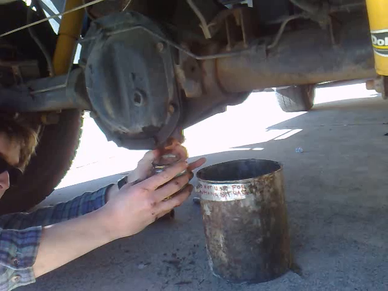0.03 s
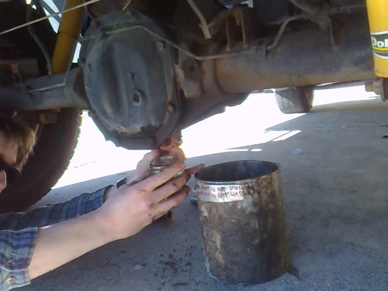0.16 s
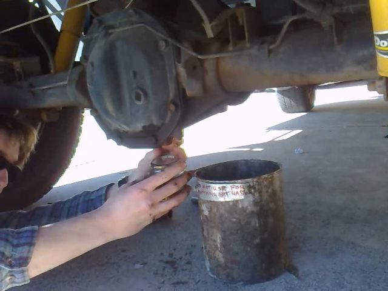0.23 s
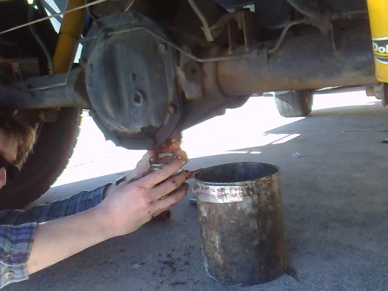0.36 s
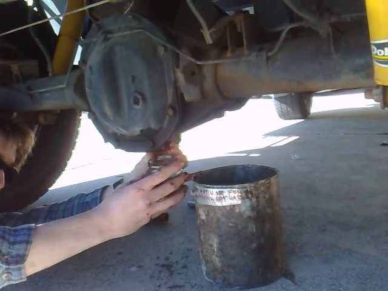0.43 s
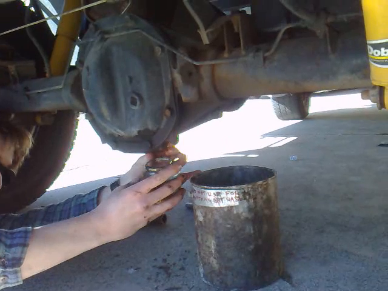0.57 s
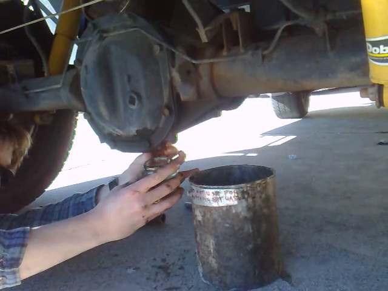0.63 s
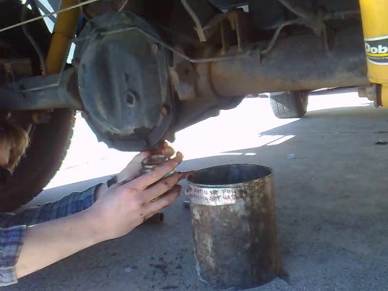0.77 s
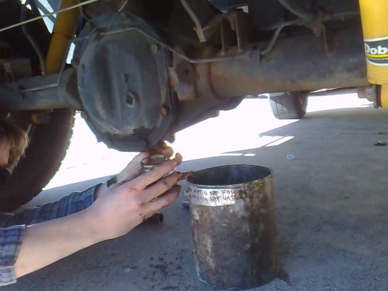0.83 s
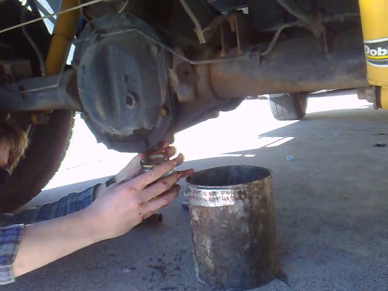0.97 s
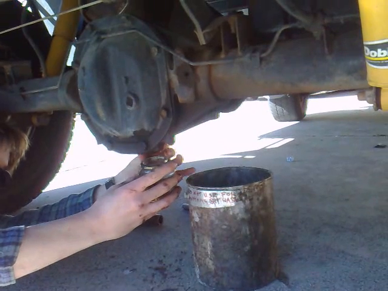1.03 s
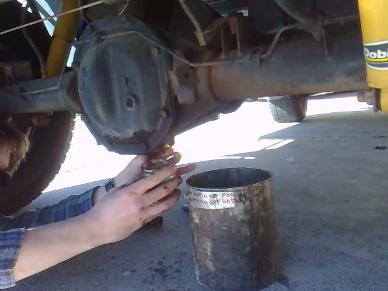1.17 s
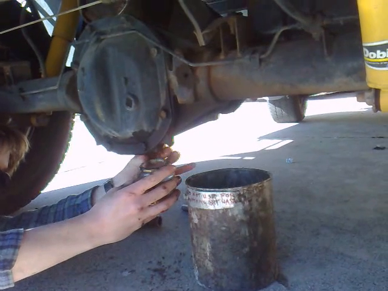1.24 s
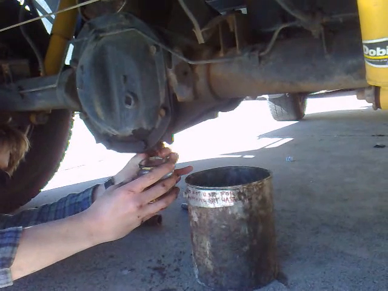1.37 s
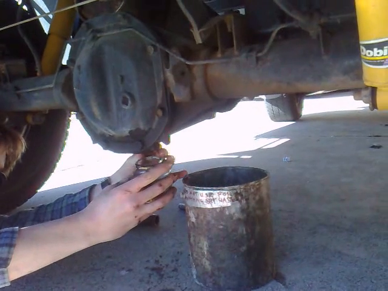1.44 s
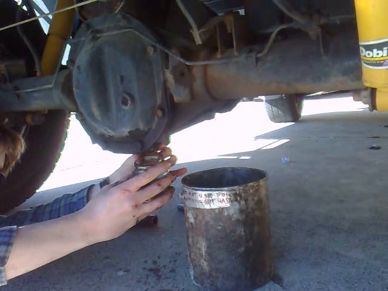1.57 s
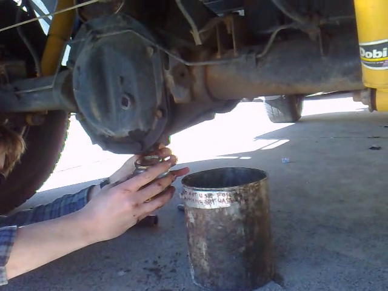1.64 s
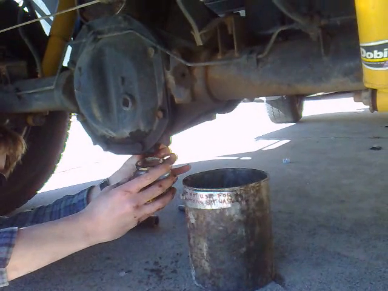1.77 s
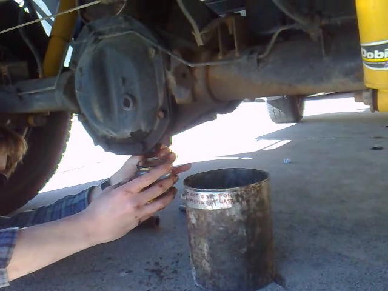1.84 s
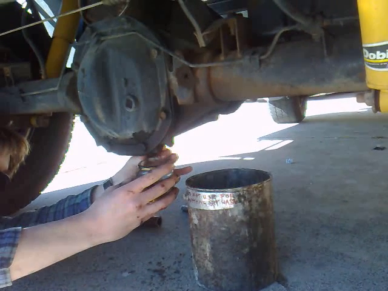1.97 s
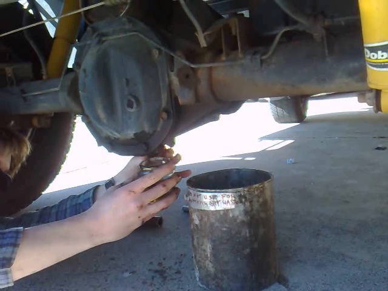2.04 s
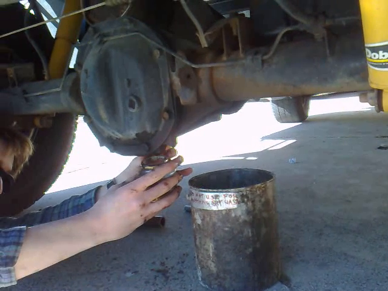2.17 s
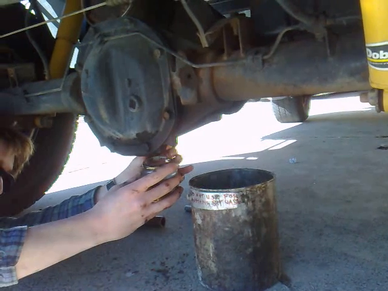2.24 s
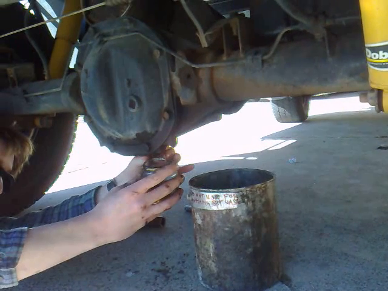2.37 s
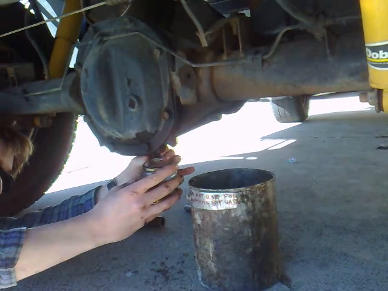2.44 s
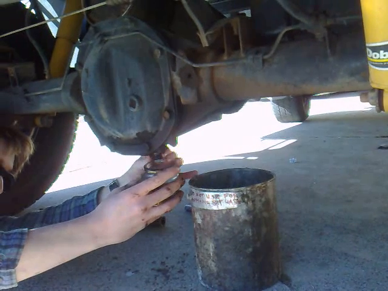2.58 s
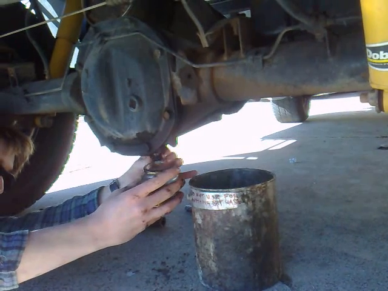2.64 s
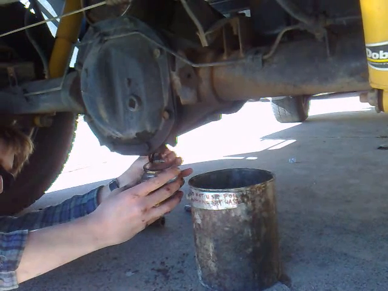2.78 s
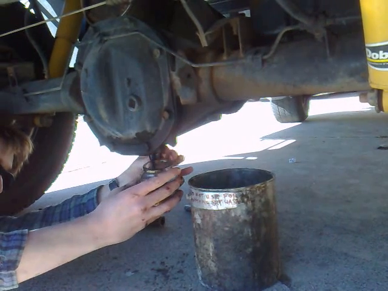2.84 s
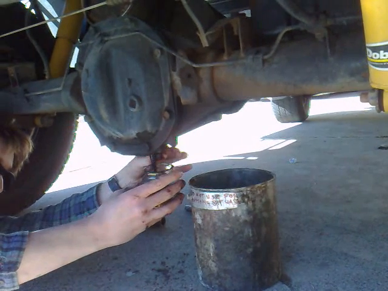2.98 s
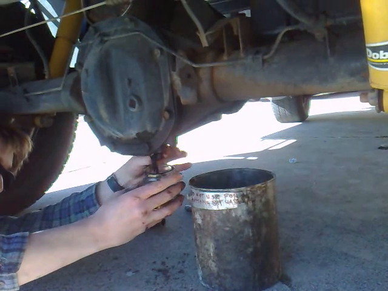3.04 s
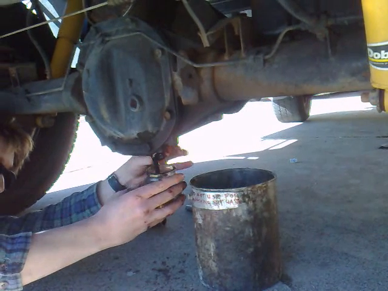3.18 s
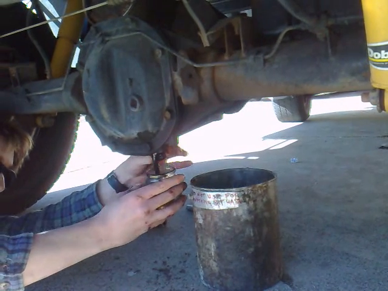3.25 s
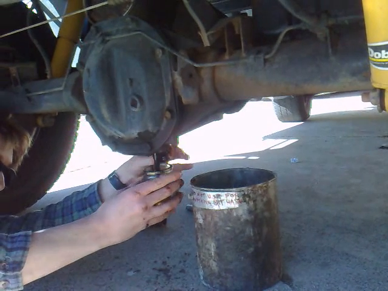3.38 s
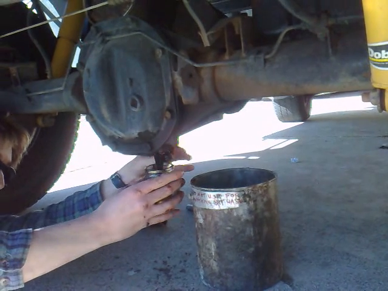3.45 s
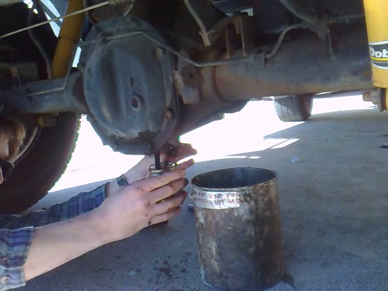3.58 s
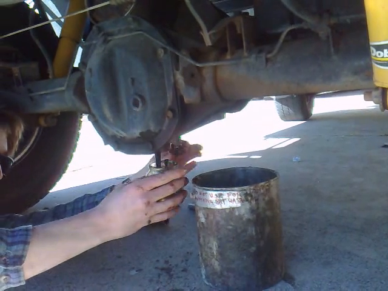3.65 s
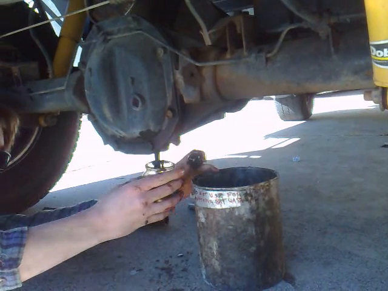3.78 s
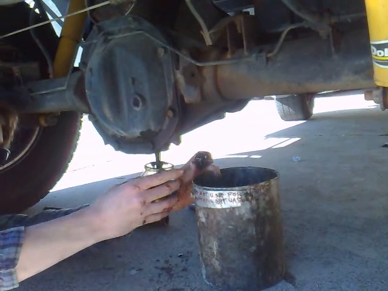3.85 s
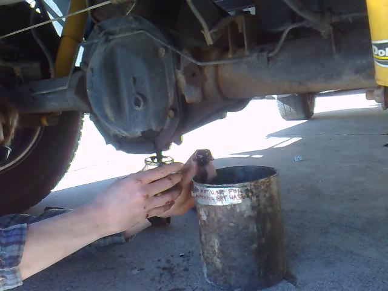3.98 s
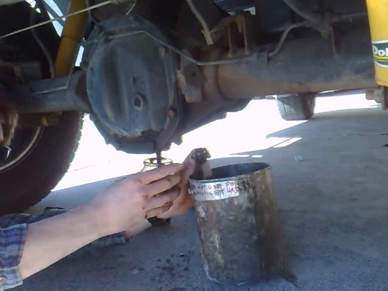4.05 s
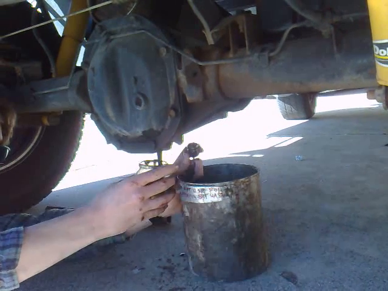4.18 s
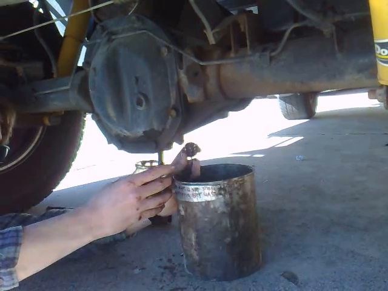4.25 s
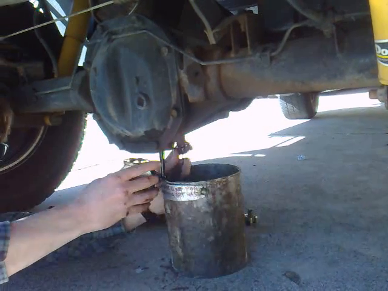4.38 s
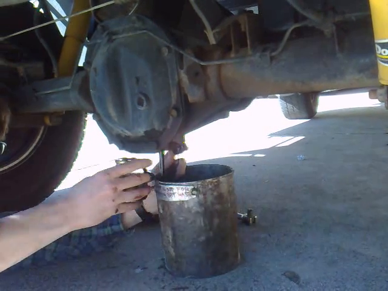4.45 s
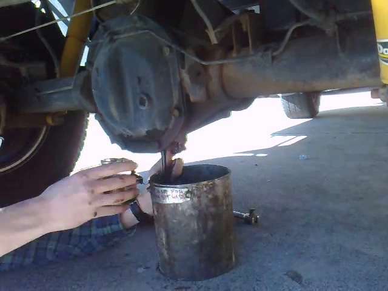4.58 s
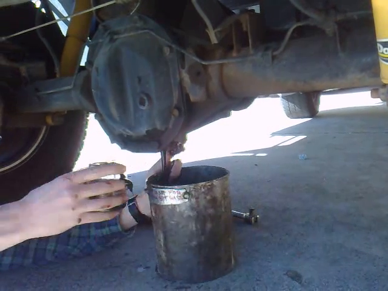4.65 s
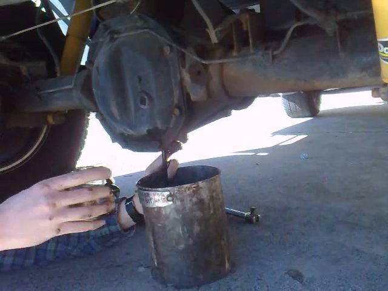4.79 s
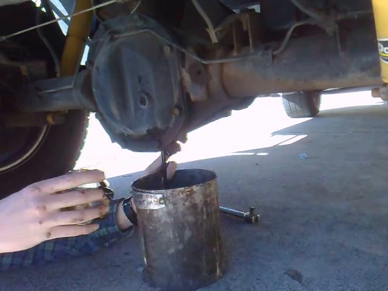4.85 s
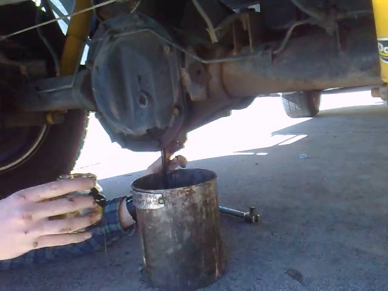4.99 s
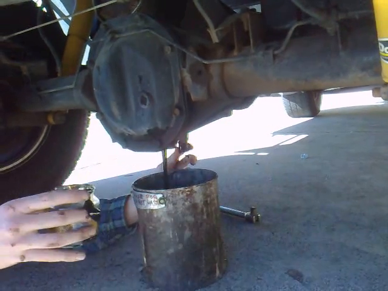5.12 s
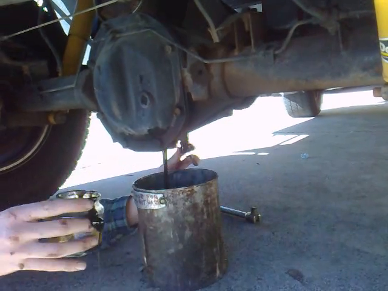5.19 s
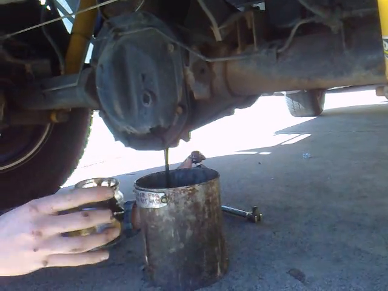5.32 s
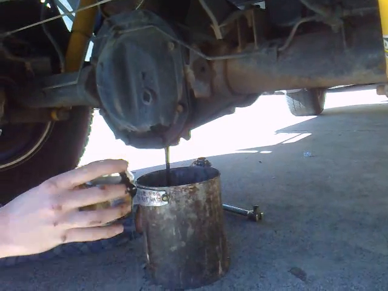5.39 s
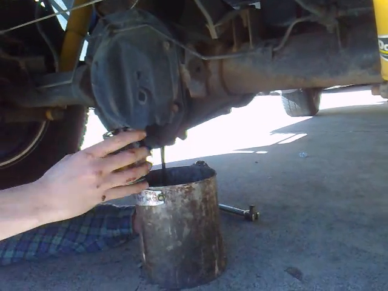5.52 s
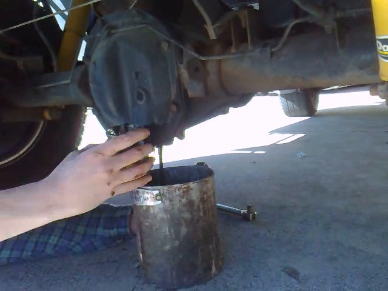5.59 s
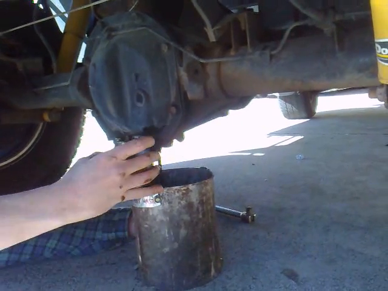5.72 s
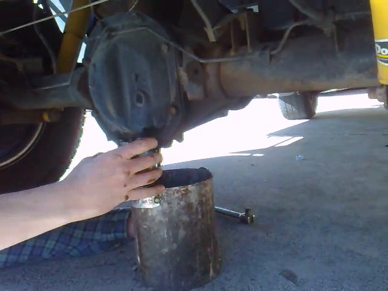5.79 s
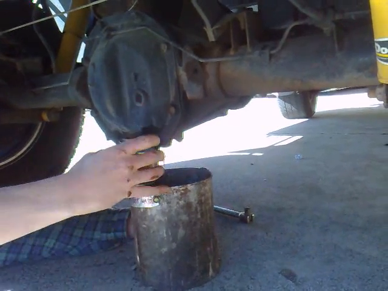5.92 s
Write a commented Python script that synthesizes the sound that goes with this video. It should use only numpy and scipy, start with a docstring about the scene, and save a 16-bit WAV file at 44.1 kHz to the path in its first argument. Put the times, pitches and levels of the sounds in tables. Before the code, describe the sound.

Quiet road noise with a sudden dry click, tiny glass ticks and clink, then loud metallic bucket dragging in jerky shoves, ending in traffic and a passing engine.

```python
"""Outside traffic rumbles, and almost at once something snaps close by; fingers and drips then tick on a jar.
The setting is an oil change under a truck: the drain plug clinks on the glass jar (damped modes), and a sleeve rubs.
Then a steel bucket is nudged and dragged over concrete in five shoves: grit forces its modes to ring and rasp.
Road noise is coloured noise, engines are harmonic tones, and a diffuse garage tail follows the nearer sounds."""
import sys
import numpy as np
from scipy import signal
from scipy.fft import rfft, irfft, next_fast_len
from scipy.io import wavfile
from scipy.ndimage import uniform_filter1d, map_coordinates

SR = 44100
rng = np.random.default_rng(int(sys.argv[2]) if len(sys.argv) > 2 else 0)


def materialize(psi):
    """Save the field psi as 16-bit PCM at rate SR to the path in sys.argv[1].

    A 1-D psi becomes a single channel; in a 2-D psi each row is a channel.
    """
    bounded = np.clip(np.atleast_2d(psi).T, -1, 1)
    quanta = np.round(bounded * 32767).astype(np.int16)
    wavfile.write(sys.argv[1], SR, quanta)


N = 262130


def amp(db):
    """Level to amplitude: 20 dB is a factor of ten."""
    return 10 ** (np.asarray(db) / 20)


def unit(x):
    """Normalization to an rms of 1."""
    return x / np.sqrt(np.mean(x ** 2) + 1e-20)


def along(points, hz):
    """Interpolation of (frequency, value) points on a logarithmic frequency axis."""
    f, v = np.transpose(points)
    return np.interp(np.log(hz + 1), np.log(f + 1), v)


def curves(rows):
    """Linear interpolation in time: one curve for each column after the time."""
    s, *cols = np.transpose(rows)
    return [np.interp(np.arange(N) / SR, s, c) for c in cols]


def during(start, end):
    """A gate, 1 between two times, with edges softened by a moving average."""
    t = np.arange(N) / SR
    return uniform_filter1d(1. * ((t >= start) & (t < end)), size=128)


def wobble(rate):
    """Slow random modulation: a smooth curve through `rate` random knots a second."""
    knots = rng.standard_normal(int(N * rate / SR) + 4)
    return map_coordinates(knots, [np.arange(N) * rate / SR])


def filtered(x, response):
    """Linear filtering: the spectrum of x times a response of frequency."""
    m = next_fast_len(N + SR // 2)
    return irfft(rfft(x, m) * response(np.fft.rfftfreq(m, 1 / SR)), m)[:N]


def coloured(x, spectrum):
    """Minimum-phase filtering: the folded cepstrum makes a (frequency, dB) shape causal."""
    size = 4096
    cepstrum = irfft(np.log(amp(along(spectrum, np.fft.rfftfreq(size, 1 / SR)))))
    fold = np.r_[1, np.full(size // 2 - 1, 2), np.zeros(size // 2)]
    impulse_response = irfft(np.exp(rfft(cepstrum * fold)))
    return signal.fftconvolve(x, impulse_response)[:len(x)]


def noise(spectrum):
    """Coloured Gaussian noise of rms 1."""
    return unit(coloured(rng.standard_normal(N), spectrum))


def fade(t60):
    """Exponential decay by 60 dB in t60 seconds, cut after a quarter second."""
    return 1000 ** (-np.arange(SR // 4) / SR / t60)


def burst(t60):
    """White noise under exponential decay: a broadband impact."""
    return rng.standard_normal(SR // 4) * fade(t60)


def ring(modes):
    """Modal synthesis: damped sines of alternating sign, each struck at a slightly random strength."""
    t = np.arange(SR // 4) / SR
    out = np.zeros(SR // 4)
    for k, (hz, db, t60) in enumerate(modes):
        strength = (-1) ** k * amp(db + rng.normal())
        out += strength * fade(t60) * np.sin(2 * np.pi * hz * t)
    return out


def add(track, s, db, sound):
    """Superposition: mix a sound in at time s, scaled to the given peak level."""
    part = track[round(s * SR):][:len(sound)]
    part += amp(db) * sound[:len(part)] / np.abs(sound).max()


def grit(rate, spread_db, smooth_share, chatter_db):
    """Frictional excitation: random impulses of uneven size over fine noise, in quick swells."""
    signs = rng.choice([-1, 1], N)
    sizes = amp(spread_db * np.clip(rng.standard_normal(N), -2, 2))
    grains = (rng.random(N) < rate / SR) * signs * sizes
    return (unit(grains) + smooth_share * rng.standard_normal(N)) * amp(chatter_db * wobble(170))


# Traffic outside: (time [s], relative level [dB])
TRAFFIC_LEVEL = [(0, -44), (1.2, -46.5), (2.1, -45), (3.2, -45), (5.2, -43), (5.94, -40.5)]
# Spectrum of the road rumble: (frequency [Hz], density [dB per Hz])
RUMBLE_SPECTRUM = [(20, -20.5), (35, -16.5), (48, -5.5), (62, -3.5), (86, 1), (110, -8), (160, -14),
                   (250, -17), (400, -24.5), (700, -36.5), (1200, -39.5), (2500, -96)]
# Spectrum of the tyre wash: (frequency [Hz], density [dB per Hz])
WASH_SPECTRUM = [(300, -20.5), (600, -2.5), (950, -7), (1400, -2.5), (2250, 0), (3000, -8), (4500, -11.5),
                 (6400, -16), (9000, -36.5), (13000, -50)]
WASH_DB, WASH_GROWS = -60, 1.6  # wash at the mean traffic level; dB of wash per dB of traffic


def traffic():
    """Broadband noise radiation: road rumble and tyre wash swell together, the wash more widely."""
    level_db, = curves(TRAFFIC_LEVEL)
    wash_db = WASH_DB + WASH_GROWS * (level_db - level_db.mean()) + 1.1 * wobble(13)
    return amp(level_db + 1.5) * noise(RUMBLE_SPECTRUM) + amp(wash_db) * noise(WASH_SPECTRUM)


# A distant engine pulls away: (time [s], mean firing frequency [Hz], relative level [dB])
ENGINE_RUN = [(2.7, 69.8, -46), (3.95, 67.4, -41.5), (4.15, 67.13, -34), (4.8, 69.77, -30),
              (5.001, 71.8, -37), (5.451, 89.86, -34), (5.94, 91.6, -37.5)]
# Harmonics of the firing frequency: (multiple [1], relative level [dB])
ENGINE_ORDERS = [(1, -0.5), (2, -18), (3, -19.5)]
# Faint hums of other vehicles: (start [s], length [s], starting frequency [Hz], mean level [dB])
VEHICLE_HUMS = [(0.398, 1.44, 289.4, -61.5), (0.898, .75, 159.7, -57), (1.9, 1.4, 207.4, -58)]
HUM_GLIDE, HUM_WAVER_DB = .05, 3.5  # relative rise of pitch per second; size of the random level swing


def engines():
    """Harmonic radiation: multiples of a wavering firing frequency, and fainter gliding tones."""
    t = np.arange(N) / SR
    firing_hz, engine_db = curves(ENGINE_RUN)
    phase = 2 * np.pi * np.cumsum(firing_hz * (1 + 0.00954 * wobble(11))) / SR
    harmonics = np.zeros(N)
    for k, db in ENGINE_ORDERS:
        harmonics += amp(db + engine_db + 2.9 * wobble(23)) * np.sin(k * phase)
    out = during(ENGINE_RUN[0][0], ENGINE_RUN[-1][0]) * harmonics
    for start, length, hz, db in VEHICLE_HUMS:
        pitch_hz = hz * (1 + HUM_GLIDE * (t - start))
        tone = np.sin(2 * np.pi * np.cumsum(pitch_hz) / SR)
        out += during(start, start + length) * amp(db + HUM_WAVER_DB * wobble(6.4)) * tone
    return out


# Reverberation of the garage: (frequency [Hz], decay time t60 [s])
GARAGE_DECAY = [(150, 0.26), (1500, 0.2), (6000, 0.15), (15000, .1)]


def garage(x):
    """Diffuse reverberation: convolution with a delayed noise tail whose treble dies first."""
    hz, t, z = signal.stft(rng.standard_normal(SR // 2), SR, nperseg=256)
    decay = amp(-60 * t / along(GARAGE_DECAY, hz)[:, None])
    tail = signal.istft(z * decay, SR, nperseg=256)[1]
    delayed = np.pad(tail, (300, 0))  # samples
    return signal.fftconvolve(x, delayed / np.linalg.norm(tail))[:N]


# Sleeve strokes: (time of the fastest moment [s], rise [s], fall [s], relative level [dB])
SLEEVE_STROKES = [(.33, 0.16, 0.16, -53), (2.6, 0.49, .3, -64.5), (4.13, 0.11, 0.14, -60),
                  (5.46, 0.037, 0.053, -56), (5.63, 0.13, 0.1, -52)]
# Spectrum of the rubbing cloth: (frequency [Hz], density [dB per Hz])
CLOTH_SPECTRUM = [(200, -12.5), (450, -2), (800, -3.5), (1400, -5), (2200, -2.5), (3200, -9), (5000, -10),
                  (6500, -21), (9000, -28), (14000, -52.5)]


def sleeve():
    """Textile friction: thread catches on thread as the flannel arm speeds up and slows."""
    t = np.arange(N) / SR
    level = np.zeros(N)
    for s, rise, fall, db in SLEEVE_STROKES:
        level += amp(db) * np.exp(-((t - s) / np.where(t < s, rise, fall)) ** 2)
    threads = grit(rate=3000, spread_db=7.5, smooth_share=1.0, chatter_db=2.0)
    return amp(2.5) * level * unit(coloured(threads, CLOTH_SPECTRUM))


# Fingers slip on the glass: (start [s], length [s], mean pitch [Hz], relative level [dB])
FINGER_SQUEAKS = [(1.468, 0.045, 3650, -69), (2.55, .05, 4600, -66), (3.61, 0.056, 1370, -64.5),
                  (3.82, .045, 1387, -65), (5.426, 0.051, 2900, -55)]


def squeaks():
    """Stick-slip tones of oily skin on glass: brief sines of quickly wavering pitch."""
    t = np.arange(N) / SR
    waver = 1 + .03 * wobble(600)
    out = np.zeros(N)
    for s, length, hz, db in FINGER_SQUEAKS:
        swell = np.sin(np.pi * np.clip((t - s) / length, 0, 1))
        out += amp(db + 8) * swell * np.sin(2 * np.pi * np.cumsum(hz * waver) / SR)
    return out


# The drain plug touches the jar: (time [s], peak level of the ring [dB])
PLUG_CLINKS = [(3.7105, -25.5), (3.7135, -28)]
# Modes of the jar: (frequency [Hz], relative level [dB], decay time t60 [s])
JAR_MODES = [(794, 10.5, 0.091), (1360, -9, 0.061), (2100, 1, 0.028), (3540, -9, 0.042), (4980, -12, 0.076),
             (5265, -13, 0.089), (6470, 9, 0.034), (6590, 2.5, .05)]
# Small ticks of oily fingers and drips: (time [s], relative peak level [dB], pitch [Hz])
JAR_TICKS = [(0.423, -39, 2200), (.830, -45.5, 4040), (1.461, -45.5, 4000), (1.675, -41.5, 2800),
             (2.103, -46, 4270), (2.707, -39.5, 2380), (2.744, -45, 4500), (2.918, -42.5, 2400),
             (3.385, -45.5, 4170), (4.028, -43, 4000), (5.369, -38.5, 2800), (5.894, -42, 5000)]
# Spectrum of a dry crack, shared with the snap: (frequency [Hz], density [dB per Hz])
CRACK_SPECTRUM = [(100, -46), (400, -7.5), (570, 0), (850, -7), (1250, -14), (1900, 3), (2500, -12),
                  (3600, 2), (4450, -15.5), (5000, -4), (5850, -4), (6300, -12.5), (9000, -25),
                  (15000, -61)]


def jar():
    """Damped modal response: the hand-held glass clinks; fingers and drips tick faintly."""
    out = np.zeros(N)
    for s, db in PLUG_CLINKS:
        add(out, s, db, ring(JAR_MODES))
        add(out, s, db - 11.0, coloured(burst(0.103), CRACK_SPECTRUM))
        add(out, s, db - 20.0, burst(0.066))
    for s, db, hz in JAR_TICKS:
        tick_spectrum = [(hz / 4, -14), (hz / 2, -9), (hz, 0), (hz * 1.4, -7), (hz * 2.5, -24)]
        add(out, s, db - 1, coloured(burst(.03), tick_spectrum))
    return out


# A sharp snap near the microphone: (time [s], peak level of the ring [dB])
SNAP_EVENT = (.1362, -4.5)
# What the snap rings with: (frequency [Hz], relative level [dB], decay time t60 [s])
SNAP_RING = [(862, -13, 0.012), (1940, -6.5, 0.0058), (2570, -2, 0.013), (2980, -12.5, .008),
             (3504, 3.5, 0.01), (3955, 0, 0.01), (5010, 2, 0.0087)]


def snap():
    """Impulsive release: a dry crack, a short low thump and a faint scatter off the axle."""
    out = np.zeros(N)
    s, db = SNAP_EVENT
    add(out, s, db, ring(SNAP_RING))
    add(out, s, db - 7, coloured(burst(.007), CRACK_SPECTRUM))
    thump = coloured(ring([(195, 0, .03)]), [(50, -18), (170, 0)])
    add(out, s + .002, db - 13.5, thump)
    add(out, s + 0.0027, db - 18.5, coloured(burst(0.032), CRACK_SPECTRUM))
    add(out, s + 0.003, db - 27.5, burst(0.076))
    return out


# The hand bumps the bucket: (time [s], peak level of the wall [dB], peak level of the rim tick [dB])
BUCKET_NUDGES = [(4.169, -36.5, -56), (4.249, -31.5, -35), (4.259, -37, -47), (4.272, -39, -60.5)]
# The rim catches on a grain and jumps free: (time [s], relative rasp peak [dB], clang peak [dB])
RIM_CATCHES = [(4.394, -9.5, -16), (4.422, -11, -19), (4.458, -5, -19), (4.466, -5, -4), (4.480, -2, -4),
               (4.5299, -4.5, -8.5), (4.583, -12.5, -21), (4.660, -9, -7), (4.683, -14.5, -7),
               (4.725, -7, -11.5), (4.746, -6, -9), (4.8001, -2.5, -16), (4.859, 2.5, -10),
               (4.9606, -5, -18.5), (4.999, -6.5, -11.5)]
# Distinct modes of the bucket's wall: (frequency [Hz], relative level [dB], decay time t60 [s])
WALL_MODES = [(324.6, -11.5, 0.14), (356.6, -15, .14), (463.6, -7.5, 0.08), (486, -0.5, 0.084),
              (524, -6, 0.081), (556.6, -4.5, 0.21), (569, -12, 0.13), (744, -8.5, 0.056), (791, -4, 0.097),
              (838.4, -7, 0.17)]
LOW_WALL = [m for m in WALL_MODES if m[0] < 650]
UPPER_WALL = [m for m in WALL_MODES if m[0] >= 650]
# Dense low modes of the bucket: (frequency [Hz], density [dB per Hz])
BOOM_SPECTRUM = [(60, -18), (150, -13), (250, -10.5), (390, -1.5), (520, 2.5), (640, -4.5), (800, -5.5),
                 (1050, -11), (1600, -46)]
# Dense middle modes: (frequency [Hz], density [dB per Hz])
CLANG_SPECTRUM = [(700, -24), (1100, -17), (1450, -3.5), (1680, -7.5), (1800, -7.5), (2150, 2), (2350, -3),
                  (2700, -13), (3300, -14), (5000, -49)]
# Dense high modes of the rim: (frequency [Hz], density [dB per Hz])
RASP_SPECTRUM = [(1500, -33), (2800, -10), (3700, -15), (4500, -6.5), (5150, -1.5), (5800, -3), (6300, -9),
                 (7000, -15.5), (8000, -16), (9300, -23.5), (11000, -32), (16000, -38.5)]


def jolts():
    """Impact excitation of a shell: soft nudges, then hard catches of the rim."""
    out = np.zeros(N)
    for s, db, tick_db in BUCKET_NUDGES:
        add(out, s, db, ring(LOW_WALL))
        add(out, s, db, coloured(burst(0.058), BOOM_SPECTRUM))
        add(out, s, tick_db, coloured(burst(0.012), CLANG_SPECTRUM))
    for s, rasp_db, clang_db in RIM_CATCHES:
        add(out, s, rasp_db + 1, coloured(burst(.03), RASP_SPECTRUM))
        add(out, s, clang_db, coloured(burst(.035), CLANG_SPECTRUM))
        add(out, s, clang_db - 16.0, ring(WALL_MODES))
    return out


SHOVE_ATTACK_S, SHOVE_RELEASE_S = 0.0058, 0.012  # linear breakaway; time constant of the stop


def shove(start, length, gain_db):
    """Transient sliding: a quick start, a push that tightens or slackens, an exponential run-out."""
    t = np.arange(N) / SR - start
    attack = np.clip(t / SHOVE_ATTACK_S, 0, 1)
    push = amp(gain_db * (np.clip(t / length, 0, 1) - .5))
    release = np.exp(-np.maximum(t - length, 0) / SHOVE_RELEASE_S)
    return attack * push * release


# Shoves of the bucket: (start [s], length [s], boom of the wall [relative dB],
# clang of the middle modes [relative dB], rasp of the rim [relative dB], push gained start to end [dB])
BUCKET_SHOVES = [(4.356, 0.1415, -18.5, -20, -23, 7), (4.537, 0.12, -21.5, -20, -21.5, -10),
                 (4.672, 0.123, -22.5, -19, -18.5, 2.5), (4.861, .112, -24.5, -23.5, -18, -2.5),
                 (4.995, .16, -23.5, -24, -23, 3)]
# Drive while creeping between shoves: boom, clang, rasp [relative dB]
CREEP_LEVELS = [-26.5, -26, -26]
# Growth with the push: boom, clang, rasp [dB per dB of push]
PUSH_GROWTH = [0.81, 1, 1.13]
SPEED_UP_S = 0.051  # from rest the rim takes this long to reach its full rasp


def effort():
    """Envelopes of the driving force on wall, middle modes and rim: shoves stand out of one long creep."""
    first = BUCKET_SHOVES[0][0]
    last = BUCKET_SHOVES[-1][0] + BUCKET_SHOVES[-1][1]
    drive = np.outer(amp(CREEP_LEVELS), shove(first, last - first, 0))
    for start, length, *levels_db, gain_db in BUCKET_SHOVES:
        pushes = [amp(db) * shove(start, length, grows * gain_db) for db, grows in zip(levels_db, PUSH_GROWTH)]
        drive = np.maximum(drive, pushes)
    wall, middle, rim = drive
    speed_up = np.clip((np.arange(N) / SR - first) / SPEED_UP_S, 0, 1) ** .5
    return wall, middle, rim * speed_up


def sheet(force, spectrum, t60, ring_db):
    """High modal density in thin steel: the direct push plus a short noise-like ring."""
    tail = burst(t60)
    ringing = signal.fftconvolve(force, tail / np.linalg.norm(tail))[:N]
    return unit(coloured(force + amp(ring_db) * ringing, spectrum))


def shaken(force, modes):
    """Forced modal response: the force convolved with the ring of the modes."""
    return unit(signal.fftconvolve(force, ring(modes))[:N])


def wander():
    """Moving point of contact round the rim: a group of modes swells at random."""
    return amp(2 * wobble(80))


BITE_DB, BITE_GROWS = 8.5, 1.82  # the wall's upper modes: gain, and exponent on the wall's drive
BOOM_FLUTTER_DB, BOOM_FLUTTER_RATE = 1.5, 45  # the bucket rocks as it slides; random knots per second


def drag():
    """Friction-driven vibration: one gritty force excites wall, middle modes and rim of the bucket."""
    force = grit(rate=1000, spread_db=3.5, smooth_share=0.42, chatter_db=0.64)
    wall, middle, rim = effort()
    rocking = amp(BOOM_FLUTTER_DB * wobble(BOOM_FLUTTER_RATE))
    distinct_low = amp(1.5) * shaken(force, LOW_WALL)
    dense_low = amp(-1.5) * sheet(force, BOOM_SPECTRUM, t60=0.14, ring_db=0.0)
    boom = wall * rocking * (distinct_low + dense_low)
    # the upper modes grow faster than the boom, so they come out when the wall is shoved hard
    bite = amp(BITE_DB) * wall ** BITE_GROWS * shaken(force, UPPER_WALL)
    clang = middle * sheet(force * wander(), CLANG_SPECTRUM, t60=0.12, ring_db=5.5)
    rasp = amp(2.5) * rim * sheet(force * wander(), RASP_SPECTRUM, t60=0.064, ring_db=-1.5)
    return boom + bite + clang + rasp


def scene():
    """Direct and reverberant sound: bucket and jar excite the garage more than the nearer, drier snap."""
    work = drag() + jolts() + jar() + squeaks()
    crack = snap()
    reverberant = garage(amp(-21.0) * work + amp(-34) * crack)
    return (work + crack + reverberant + sleeve() + traffic() + engines())[None]


TOP_HZ = 15850  # upper band limit


def record(dry):
    """Microphone chain: hiss, gain reduction following smoothed power, soft overload, band limit."""
    x = dry[0] + amp(-66.0) * rng.standard_normal(N)
    pole = np.exp(-1 / (.3 * SR))  # 0.3 s averaging, so the level stays ducked after loud sound
    loudness = np.sqrt(np.abs(signal.lfilter([1 - pole], [1, -pole], x ** 2)))
    x = x / np.sqrt(1 + (loudness / amp(-19)) ** 2)
    x = x / (1 + (x / .72) ** 6) ** (1 / 6)  # peaks saturate towards 0.72
    return filtered(x, lambda hz: hz < TOP_HZ)[None]


dry = scene()
out = record(dry)
materialize(out)
```